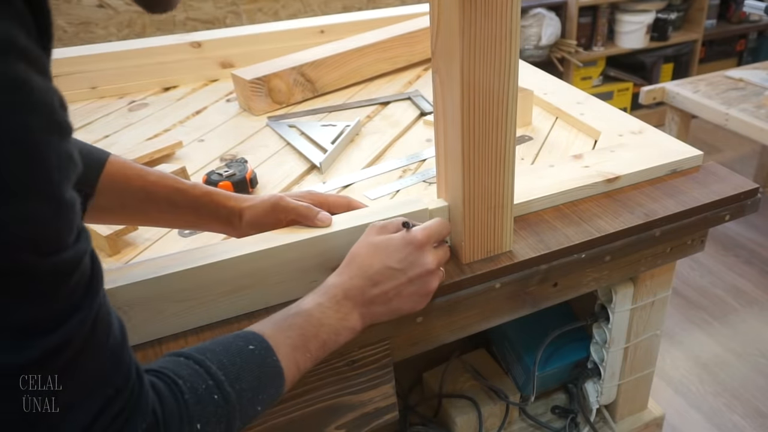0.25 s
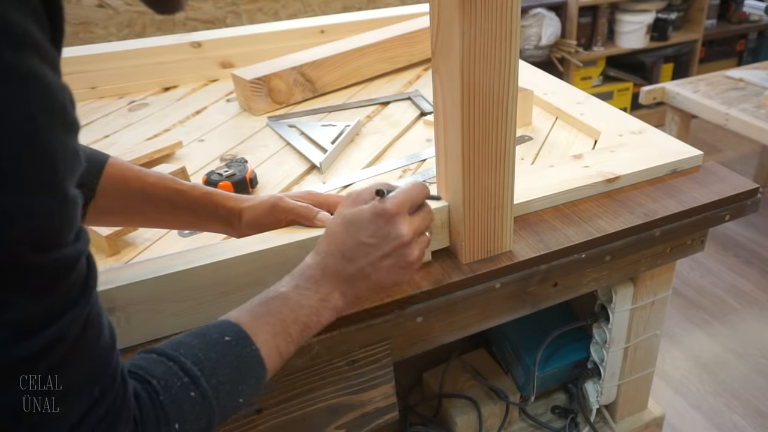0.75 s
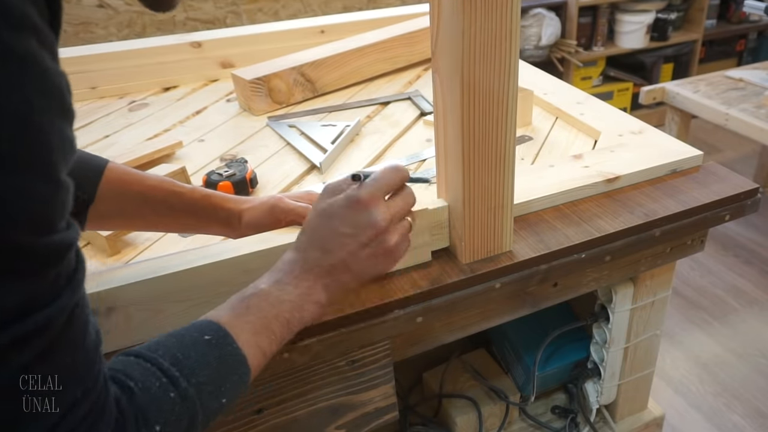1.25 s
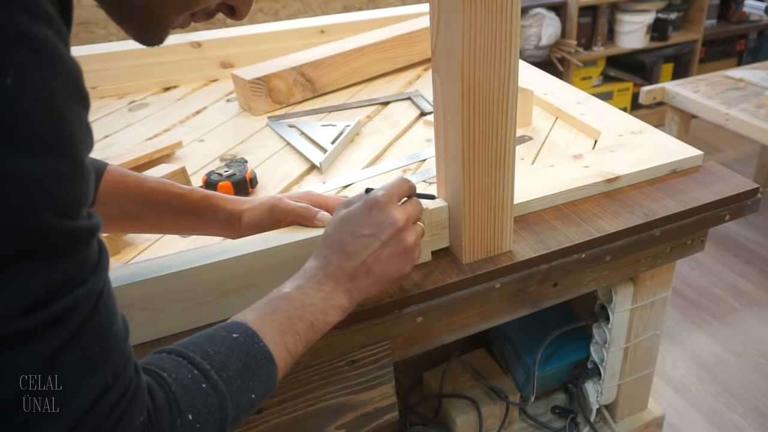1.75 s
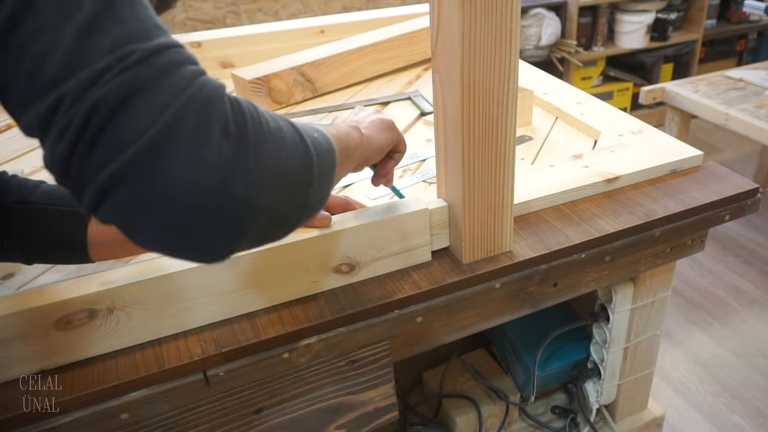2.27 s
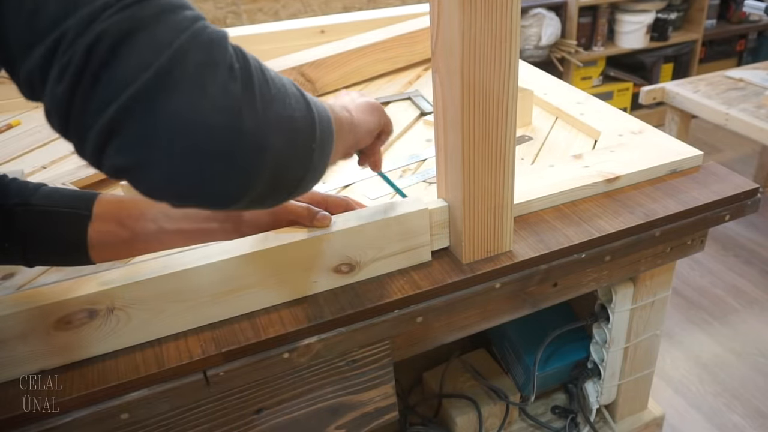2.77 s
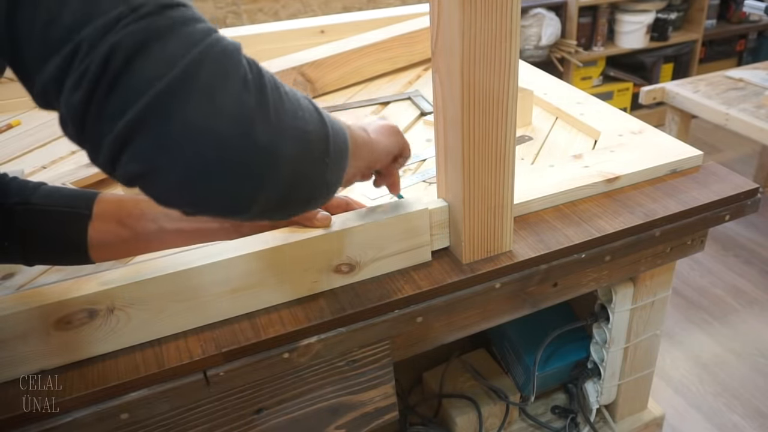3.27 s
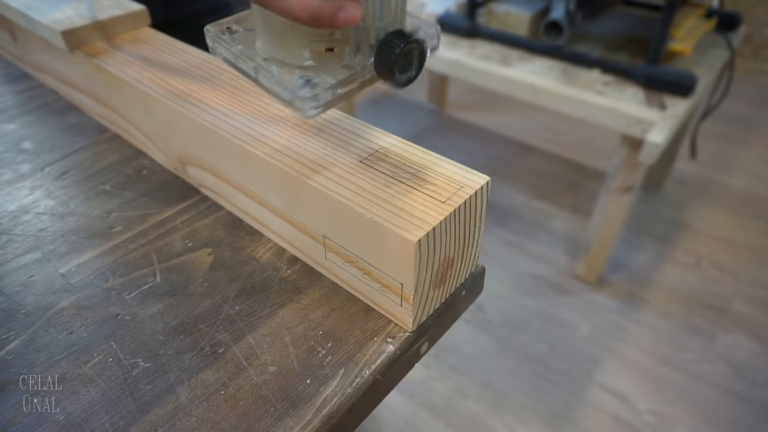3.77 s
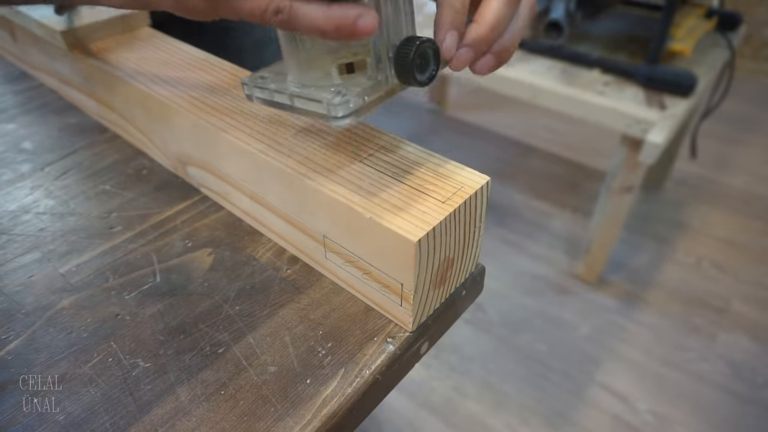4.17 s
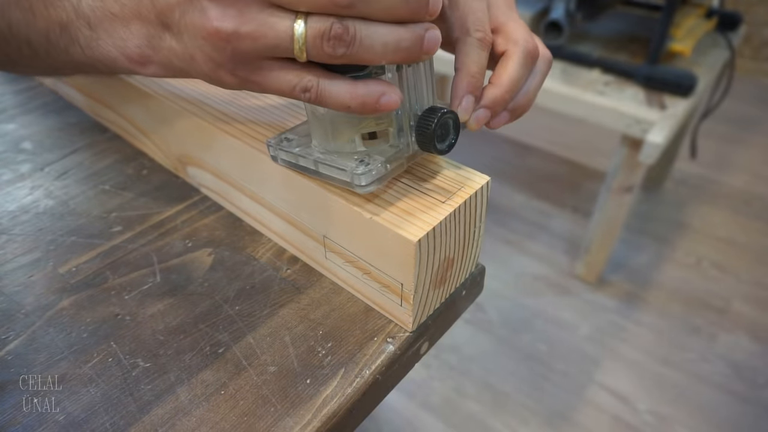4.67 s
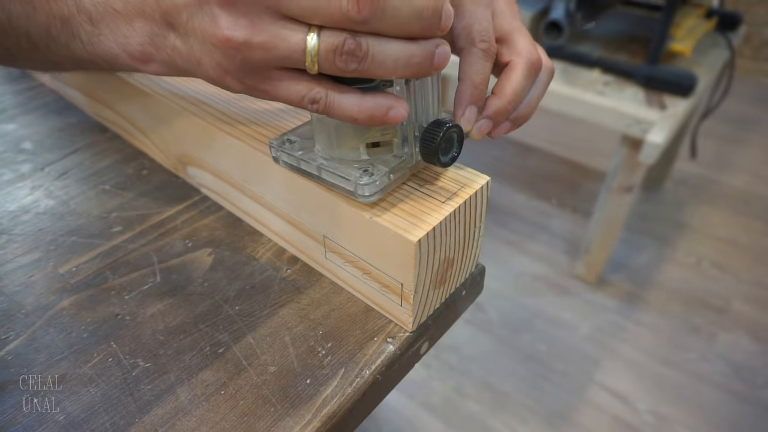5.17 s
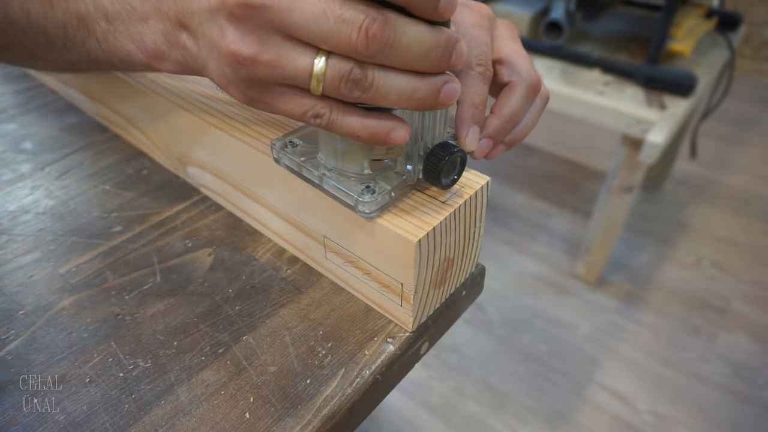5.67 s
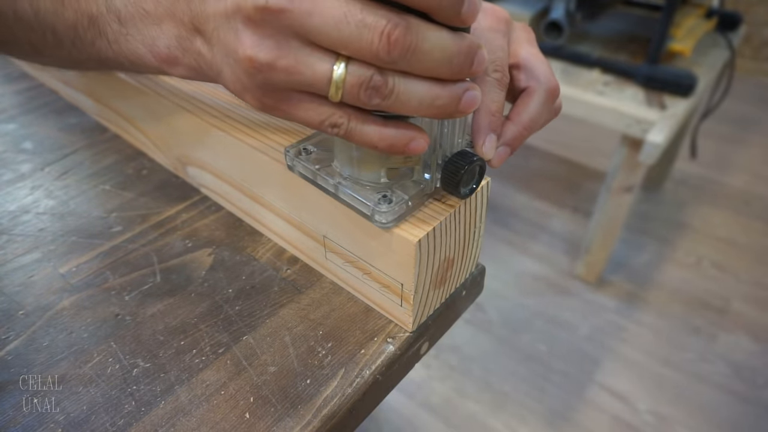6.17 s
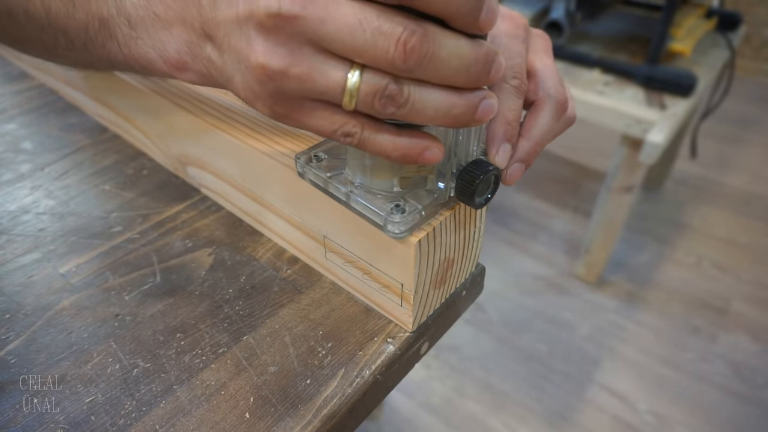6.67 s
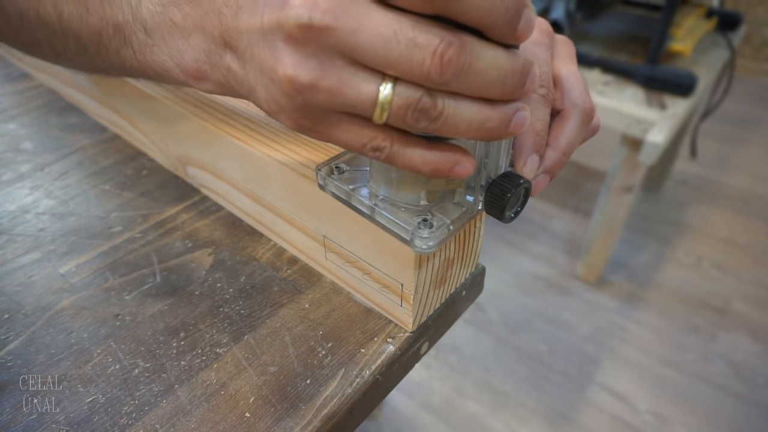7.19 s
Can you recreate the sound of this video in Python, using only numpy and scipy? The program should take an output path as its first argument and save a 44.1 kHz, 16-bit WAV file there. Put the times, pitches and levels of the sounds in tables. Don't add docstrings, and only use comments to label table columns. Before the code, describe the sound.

Close stereo pickup with short room echoes. First come dry, gritty pencil strokes and one soft wooden bump over hush and a tiny fast tick. About halfway, a small router starts abruptly, its pitch climbing to a high whine with airy fan noise. It touches wood, drags and bites; the tone drops, wavers and grows harsh while the air becomes muffled.

```python
import sys
import numpy as np
from scipy import signal
from scipy.fft import rfft, irfft, next_fast_len
from scipy.io import wavfile
from scipy.ndimage import uniform_filter1d

SR = 44100
rng = np.random.default_rng(int(sys.argv[2]) if len(sys.argv) > 2 else 0)


def to_wav(s):
    ch = np.atleast_2d(s).T
    pcm = np.round(np.clip(ch, -1, 1) * 32767)
    wavfile.write(sys.argv[1], SR, pcm.astype(np.int16))


def volts(x):
    e = np.asarray(x, float) / 20
    return 10 ** e


N = 327663
T = np.arange(N) / SR
PAD = next_fast_len(N + SR)
HZ = np.fft.rfftfreq(PAD, 1 / SR) + 1e-3
SWITCH_S = 3.817

# time in seconds, speed in Hz.
SPEED = [(5.029, 1375), (5.149, 1357), (5.424, 1299), (5.679, 1343), (5.76, 1313), (5.899, 1242),
         (6.02, 1209), (6.302, 1157), (6.451, 1144), (6.5, 1178), (6.56, 1212), (6.61, 1225), (6.77, 1156),
         (6.902, 1126), (7.051, 1107), (7.17, 1171), (7.262, 1135), (7.43, 1120)]


def through(x, gain):
    return irfft(rfft(x, PAD) * gain, PAD)[..., :N]


def level(x, db=0):
    return x * volts(db) / np.sqrt(np.mean(x ** 2))


def noise(spectrum):
    f, db = np.transpose(spectrum)
    colour_db = np.interp(np.log(HZ), np.log(f), db)
    return level(through(rng.standard_normal(N), volts(colour_db)))


def walk(rate):
    k = max(int(SR / rate), 2)
    return level(uniform_filter1d(uniform_filter1d(rng.standard_normal(N), k), k))


def ring(x, modes):
    gain = 0
    for k, (f, width, db) in enumerate(modes):
        gain = gain + (-1) ** k * volts(db) / (1 + 1j * (HZ - f ** 2 / HZ) / width)
    return through(x, gain)


def thin(x):
    return through(x, 1 / (1 + (480 / HZ) ** 6))


def curves(table, rest_db=-120):
    s, *columns = np.transpose(table)
    return [np.interp(T, s, c, rest_db, c[-1] if s[-1] > 7 else rest_db) for c in columns]


def decays(events):
    return sum(volts(db) * (T > s) * np.exp(-np.maximum(T - s, 0) / length) for s, db, length in events)


def swell(s, width):
    return np.exp(-.5 * ((T - s) / width) ** 2)


def bumps(events):
    return sum(volts(db) * swell(s, width) for s, db, width in events)


def step(s, width):
    return .5 + .5 * np.tanh((T - s) / width)


def heard(x, wet_db, t60, pan_db):
    right_lag_s = 4 / SR
    t = T[:SR // 2]
    tails = rng.standard_normal((3, len(t))) * np.exp(-np.log(1000) * t / t60) * (t > .002)
    tails = rfft(tails / np.sqrt(np.sum(tails[0] ** 2)), PAD)
    apart = 1 / (1 + (1900 / HZ) ** 8)
    common = 0.53 * np.sqrt(1 - apart) * tails[0]
    room = volts(wet_db) * (common + np.sqrt(apart + 0.15) * tails[1:])
    direct = np.exp(-2j * np.pi * HZ * apart * np.array([[0], [right_lag_s]]))
    return through(x, direct + room) * volts(np.reshape([pan_db, -pan_db], (2, -1)) / 2)


def room_hush():
    # frequency in Hz, level in dB per Hz.
    hush_colour = [(18, -64), (30, -60), (569, -22.5), (780, -12.5), (1040, -8), (1390, -12), (2350, -7),
                   (3310, -14.5), (3980, -17), (5450, -18.5), (6550, -15), (7470, -21.5), (16000, -21.5)]
    own = np.array([noise(hush_colour), noise(hush_colour)])
    common = 0.53 * ring(noise(hush_colour), [(770, 380, 0)])
    return level(own + common, -57.5) * volts(0.11 * walk(6))


def ticker():
    # frequency in Hz, width in Hz, level in dB.
    casing = [(1006, 354, -0.5), (2240, 260, -7.5), (2944, 66, -1), (3880, 630, -5.5), (6700, 580, -9),
              (9200, 590, -14.5), (15400, 500, -26)]
    start_s, rate_hz, rattle_s = .0064, 75.0, .0009
    at = (np.arange(start_s, N / SR, 1 / rate_hz) * SR).astype(int)
    steps = np.zeros(N)
    steps[at] = (-1) ** np.arange(len(at)) * volts(1.2 * rng.standard_normal(len(at)))
    rattle = signal.lfilter([1], [1, -np.exp(-1 / (rattle_s * SR))], abs(steps))
    rattle = rattle * np.sign(rng.standard_normal(N))
    knock = ring(ring(steps, casing[:1]), casing[:1])
    knock = knock + 0.33 * ring(steps, casing[1:3]) + 0.12 * ring(rattle, casing[1:])
    return level(thin(knock), -58.5)


def board():
    # start in seconds, level in dB, decay in seconds.
    nudges = [
        (.17, -70, 0.023),
        (2.115, -54, 0.03),
        (2.141, -52, 0.022),
        (2.196, -67, 0.035),
    ]
    # frequency in Hz, width in Hz, level in dB.
    board_modes = [(151, 24, -6), (367, 50, 6), (635, 84, 1.5), (950, 120, -1)]
    push = uniform_filter1d(decays(nudges), int(0.0091 * SR)) * rng.standard_normal(N)
    return volts(17) * through(ring(push, board_modes), 1 / (1 + (90 / HZ) ** 4))


def pencil():
    # peak in seconds, level in dB, rise and fall in seconds, scrape in dB.
    strokes = [(.634, -52.5, 0.13, 0.05, -9), (.72, -55.5, 0.054, 0.062, -3),
               (1.089, -47.5, .02, 0.043, -9), (1.122, -46, 0.021, 0.025, -7), (1.2, -58, 0.06, .06, -3),
               (1.74, -62, 0.15, 0.039, 1), (1.976, -60, .06, 0.055, -5), (2.562, -55.5, 0.078, 0.13, -6),
               (2.65, -63, 0.11, 0.16, -1), (3.048, -59.5, .09, 0.11, -2), (3.126, -62, .08, 0.11, 0),
               (3.447, -46.5, 0.0067, 0.094, -1.5)]
    # start in seconds, level in dB, decay in seconds.
    taps = [
        (1.117, -47, .012),
        (1.126, -51, .01),
        (3.438, -52, .002),
        (3.4425, -41, .003),
    ]
    # frequency in Hz, width in Hz, level in dB.
    pencil_modes = [(3310, 320, -1), (5000, 350, 5.5), (6620, 320, 4)]
    hiss_db, hiss_power = -50.5, 0.32
    bright = [(11400, 37000, 0)]
    catches = rng.random(N) < .2
    grit = rng.standard_normal(N) * volts(3.5 * np.minimum(rng.exponential(size=N), 4) * catches)
    wood = level(ring(grit, pencil_modes)) + volts(-17.5) * level(ring(grit, [(4340, 5900, 0)]))
    scrape = level(ring(grit, [(2120, 2000, 0)]))
    hiss = level(ring(ring(grit, bright), bright))
    out = decays(taps) * (wood + .3 * hiss)
    for s, db, rise, fall, scrape_db in strokes:
        press = volts(db) * np.interp(T, [s - rise, s, s + fall], [0, 1, 0]) ** 2
        out = out + press * (wood + volts(scrape_db) * scrape)
        out = out + volts(hiss_db) * press ** hiss_power * hiss
    return thin(out * volts(2.0 * walk(150)))


def base_seated():
    return step(5.7, 0.026)


def shaft_speed():
    # shortfall in Hz, time constant in seconds.
    spin_up = [(700, .03), (614, .24)]
    run = np.maximum(T - SWITCH_S, 0)
    hz = np.interp(T, *np.transpose(SPEED))
    hz = hz - sum(short * np.exp(-run / tau) for short, tau in spin_up)
    return uniform_filter1d(hz, int(0.011 * SR))


def feed():
    # time in seconds, cutter in dB, shaft tone in dB, chatter from 0 to 1.
    feed_rows = [(4.931, -25, -48, 0.9), (4.99, -32, -35, 0.5), (5.15, -26, -23, 0.8),
                 (5.3, -20.5, -22.5, 0.3), (5.44, -24.5, -25, .1), (5.56, -29, -28.5, 0.12),
                 (5.72, -18, -30.5, 0.25), (5.9, -20.5, -25, 1), (6.04, -18.5, -27.5, 0.78),
                 (6.248, -21.5, -34, 0.99), (6.45, -18, -23, 0.32), (6.5, -22.5, -34, 0.08),
                 (6.6, -15, -28, 0.33), (6.77, -19.5, -28, 0.7), (6.9, -22, -25, 0.73),
                 (7.03, -18, -31, 0.4), (7.101, -23, -30, 0.88), (7.43, -18.5, -22.5, 0.37)]
    s, *columns = np.transpose(feed_rows)
    cut_db, shaft_db, chatter = (np.interp(T, s, c) for c in columns)
    cut_db = cut_db - 38 * np.maximum(s[0] - T, 0)
    return s[0], cut_db, shaft_db, chatter


def tone(hz, order, rough, fade_db, lag=0):
    turn = 2 * np.pi * np.cumsum(hz) / SR
    size = np.sqrt(2) * (1 + rough * (walk(620) + 1j * walk(450))) * volts(fade_db * walk(7.7))
    phase = order * (turn + lag) + rng.uniform(0, 2 * np.pi)
    return np.imag(size * np.exp(1j * phase)) * (order * hz < .45 * SR)


def shaft_whirl(hz, contact_s, cut_shaft_db):
    # shaft speed in Hz, level in dB.
    whirl = [(450, -69), (900, -57), (1110, -42), (1140, -26.5), (1300, -32.5), (1365, -43.5)]
    # centre in seconds, depth in dB, width in seconds.
    skips = [
        (5.231, 15.5, 0.035),
        (5.662, 9, 0.018),
        (5.858, 25, 0.02),
        (6.02, 12, 0.015),
        (7.41, 3, 0.016),
    ]
    free_db = np.interp(hz, *np.transpose(whirl))
    skip_db = sum(db * swell(s, width) for s, db, width in skips)
    gain = volts(np.where(T < contact_s, free_db, cut_shaft_db - skip_db))
    return gain * tone(hz, order=1, rough=0.033, fade_db=1.8)


def fan_blades(hz):
    # blade rate in Hz, level in dB.
    shroud = [(3600, -58), (6800, -41), (8700, -47), (9400, -34), (10400, -26), (11000, -25)]
    # frequency in Hz, width in Hz, level in dB.
    slot_hz, slot_width_hz, slot_db = (8960, 290, -23.5)
    blade_hz = 8 * hz
    gain = volts(np.interp(blade_hz, *np.transpose(shroud)) - 3.5 * step(5.36, 0.029))
    gain += base_seated() * volts(slot_db) / (1 + ((blade_hz - slot_hz) / slot_width_hz) ** 2)
    return gain * tone(hz, order=8, rough=0.046, fade_db=-2.0)


def commutator(hz):
    shortfall = np.maximum(1 - hz / SPEED[0][1], .004)
    bars = volts(-14.5 - 5.5 * base_seated()) * shortfall ** 1.58 * step(3.836, 0.001)
    sparks = .045 * walk(400)
    bar_tone = bars * volts(1.5) * tone(hz, order=12, rough=0.89, fade_db=-3.5, lag=sparks)
    octave = bars * volts(-8) * tone(hz, order=24, rough=.5, fade_db=1, lag=sparks) * (hz < 520)
    return bar_tone, octave


def cooling_air():
    # frequency in Hz, level in dB per Hz.
    air_colour = [(180, -97), (300, -52), (528, -26.5), (1120, -10.5), (1230, -12), (1320, -10.5),
                  (1930, -10), (2650, -1), (3130, -1.5), (3580, 1), (5340, 1), (6850, 5), (12500, -1),
                  (15200, -6), (16000, -45)]
    # centre in seconds, level in dB, width in seconds.
    leaks = [
        (6.13, -35.5, 0.098),
        (6.35, -42, 0.2),
        (6.75, -48, 0.07),
        (7.21, -44, 0.036),
    ]
    # frequency in Hz, width in Hz.
    dark_bands = [(2000, 300), (4050, 450), (5100, 400)]
    seated, run = base_seated(), np.maximum(T - SWITCH_S, 0)
    slow = np.exp(-(run / 0.11) ** 2)
    leak = bumps(leaks)
    vent = volts(-19.5 - 9.5 * slow - 2 * run - 15 * seated) + leak
    rush = volts(-42.5 - 8.5 * slow - 17 * seated) * volts(3.6 * seated * walk(16)) + volts(-16) * leak
    treble = 1 / (1 + (2300 / HZ) ** 12)
    air = noise(air_colour)
    air = through(air, treble) * vent + level(through(air, 1 - treble)) * rush
    notches = np.prod([1 - .9 * np.exp(-((HZ - f) / width) ** 2) for f, width in dark_bands], axis=0)
    return air + seated * (through(air, notches) - air)


def base_rub():
    # centre in seconds, level in dB, width in seconds.
    rubs = [(4.0, -40.5, 0.027), (5.05, -45, 0.084), (5.2, -39, 0.057), (5.38, -29, 0.07),
            (5.7, -46, 0.085), (6.08, -43, 0.026), (6.22, -39, 0.09), (6.76, -36.5, 0.028),
            (7.25, -50, 0.048)]
    drag = level(ring(rng.standard_normal(N), [(780, 300, -9.0), (1130, 85, 5.5)]))
    return drag * (volts(-62.5) + bumps(rubs)) * volts(-6.0 + 3.6 * walk(30))


def bearing_cage(hz):
    # time in seconds, level in dB.
    cage = [(4.44, -93), (4.52, -51), (5.2, -48.5), (5.4, -49.5), (5.65, -48), (5.9, -82.5), (6.7, -70),
            (6.8, -98)]
    return volts(curves(cage)[0]) * tone(hz, order=.4, rough=0.024, fade_db=3.5)


def cutter(hz, cut_db, chatter):
    # multiple of the shaft, level in dB.
    cut_orders = [(1, -2), (2, -11), (3, -12), (4, -7), (5, -4), (6, 2.5), (7, 1), (8, -5), (9, -6.5),
                  (10, -8.5), (11, -5), (12, -9), (13, -5)]
    # frequency in Hz, width in Hz, level in dB.
    housing = [(3492, 13, 2.5), (5200, 24, -23), (6500, 73, -34), (7050, 310, 8.5), (7650, 340, -9),
               (9615, 370, 6.5), (10040, 19, -50), (10057, 430, 7.5), (10500, 17, -54), (11490, 12.6, 23),
               (11700, 960, 9), (12400, 260, 14.5)]
    # centre in seconds, level in dB, width in seconds.
    flutes = [(4.99, -22.5, 0.039), (5.25, -30, 0.096), (5.43, -24, 0.022), (5.67, -16.5, 0.036),
              (5.84, -33, .04), (6.0, -32, 0.062), (6.2, -32.5, 0.064), (6.38, -27.5, 0.038),
              (6.62, -29, 0.066), (6.72, -30.5, 0.022), (7.0, -33.5, 0.091), (7.3, -35, 0.044)]
    seated = base_seated()
    dull_db = 8.5 + (2.2 - 8.5) * seated
    lift_db = 11 + (5.5 - 11) * seated
    slip = .012 * walk(250) + .06 * walk(45)
    edge = .008 * chatter
    both = (volts(-44.5) + bumps(flutes)) * volts(np.minimum(cut_db + 44.0, 0))
    both = both * tone(hz, order=2, rough=0.064, fade_db=3.17, lag=slip)
    blows = 0
    for k, db in cut_orders[2:]:
        gain = volts(db - dull_db * max(k - 8, 0) + lift_db * (k < 6))
        blows = blows + gain * tone(hz, k, chatter * k / 10, 1.27, slip + edge * k * walk(190))
    blows = level(blows + volts(1) * ring(blows, housing))
    return both + volts(cut_db + 2.0) * blows


def router():
    on = np.clip((T - SWITCH_S) / 0.0064, 0, 1)
    hz = shaft_speed()
    contact_s, cut_db, cut_shaft_db, chatter = feed()
    bar_tone, octave = commutator(hz)
    shaft = shaft_whirl(hz, contact_s, cut_shaft_db) + fan_blades(hz) + bar_tone
    shaft = shaft + bearing_cage(hz) + cutter(hz, cut_db, chatter)
    return on * shaft, on * (octave + cooling_air() + base_rub())


def rumble():
    # frequency in Hz, level in dB per Hz.
    rumble_colour = [(12, -29), (20, -6), (60, 0.5), (134, -15), (258, 2), (340, -10), (400, -5), (520, -1),
                     (880, -120)]
    # centre in seconds, level in dB, width in seconds.
    jolts = [(4.0, -84, .03), (4.3, -76, 0.047), (4.62, -81.5, 0.073), (4.85, -61.5, 0.023),
             (5.1, -73, .06), (5.33, -65, 0.056), (5.6, -67, 0.098), (6.0, -93, 0.072), (6.38, -72, .08),
             (6.86, -64, 0.086), (7.05, -76, 0.11), (7.23, -62, .04), (7.4, -59, .05)]
    shared = noise(rumble_colour)
    shake = volts(-83.5) * (T > SWITCH_S) + bumps(jolts)
    sides = np.array([noise(rumble_colour) + 1.06 * shared for _ in range(2)])
    return sides * shake * volts(-6.5 + 2.7 * walk(29))


def scene():
    # time in seconds, left minus right in dB.
    router_pan = [(0, -3), (5.2, 3), (6.2, 2), (6.7, 2.8), (7.43, 0.5)]
    shaft, rest = router()
    pan_db = curves(router_pan)[0]
    out = heard(shaft, -2.5, 0.16, pan_db) + heard(rest, 0.78, 0.15, pan_db)
    out = thin(np.tanh(.7 * out) / .7)
    out += heard(pencil() + board(), -0.53, 0.11, 2.4)
    out += heard(ticker(), -24.5, 0.42, 7.9)
    return out + room_hush() + rumble()


def roll_off(x):
    return signal.sosfilt(signal.butter(12, 16370, fs=SR, output="sos"), x)


def record(dry):
    top_hz = 15850
    mix = through(dry, 1 / (1 + (HZ / top_hz) ** 200))
    return roll_off(mix)


dry = scene()
out = record(dry)
to_wav(out)
```